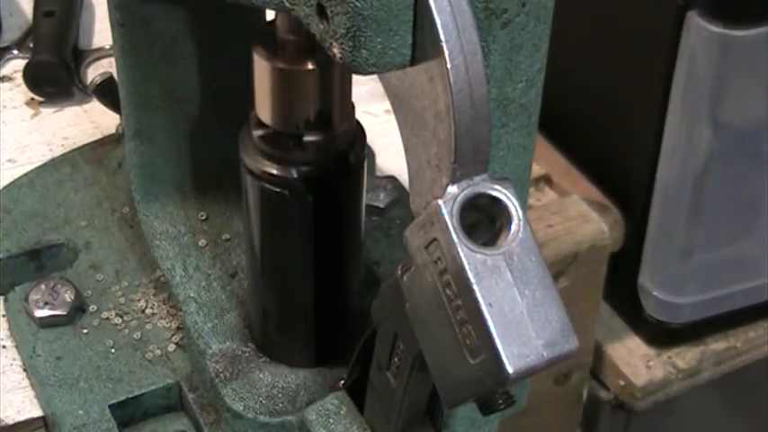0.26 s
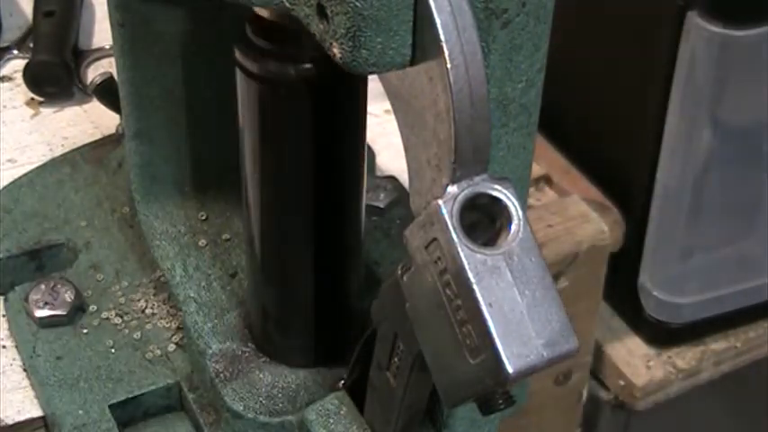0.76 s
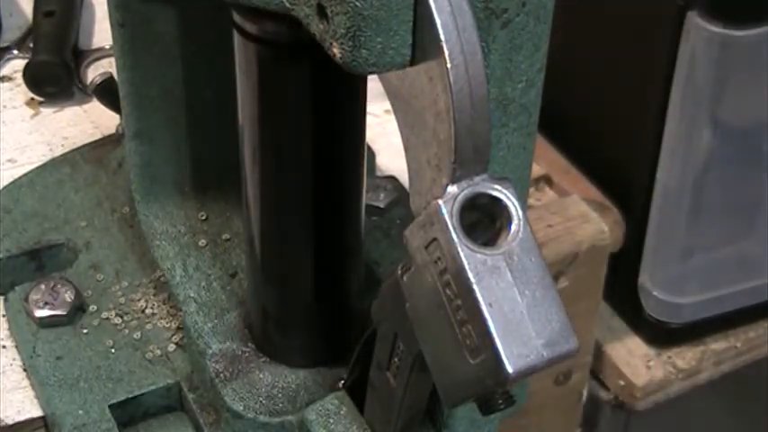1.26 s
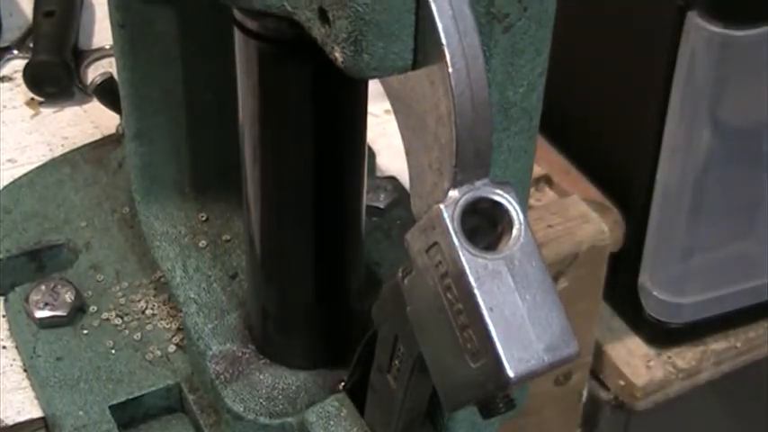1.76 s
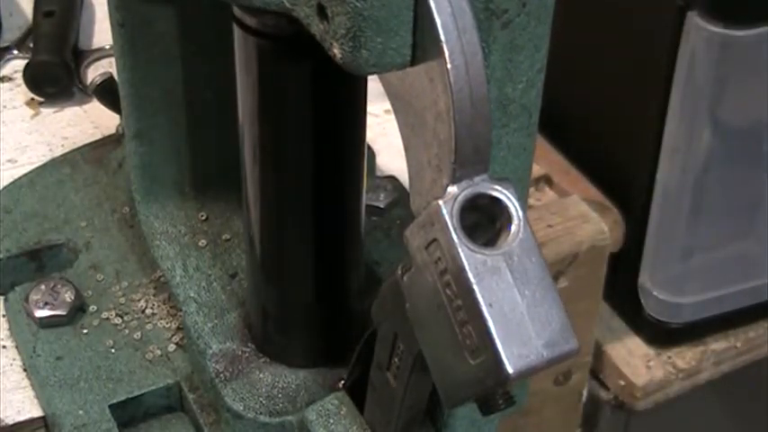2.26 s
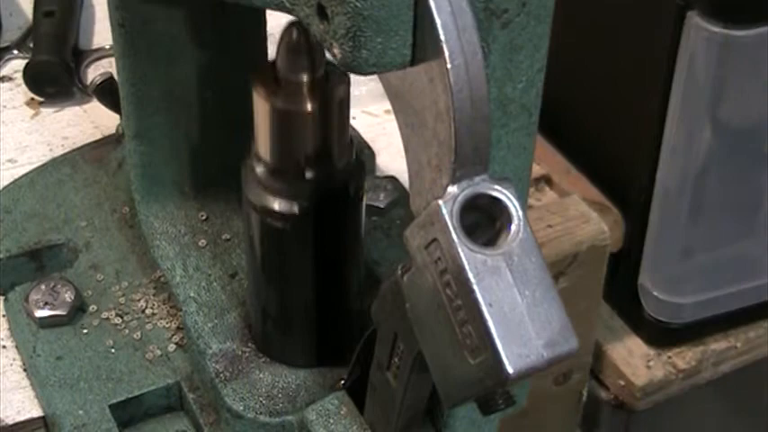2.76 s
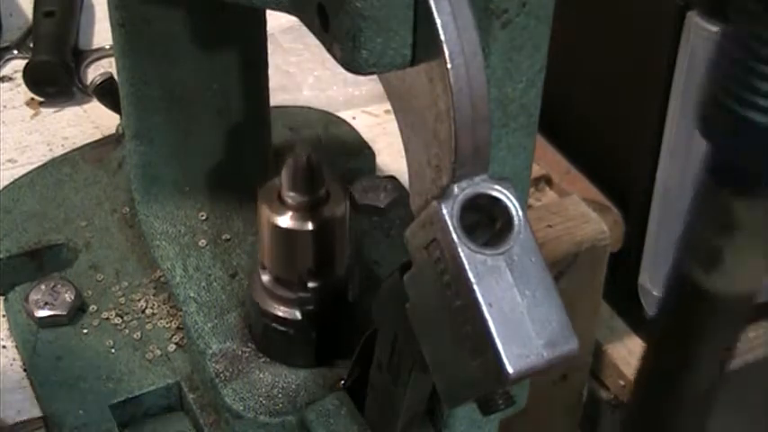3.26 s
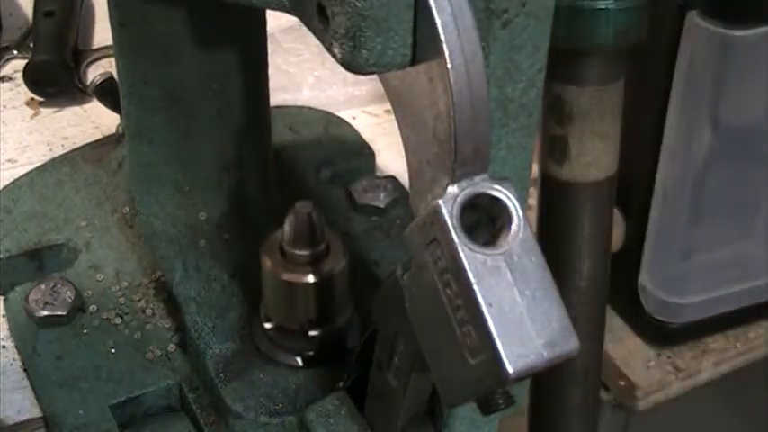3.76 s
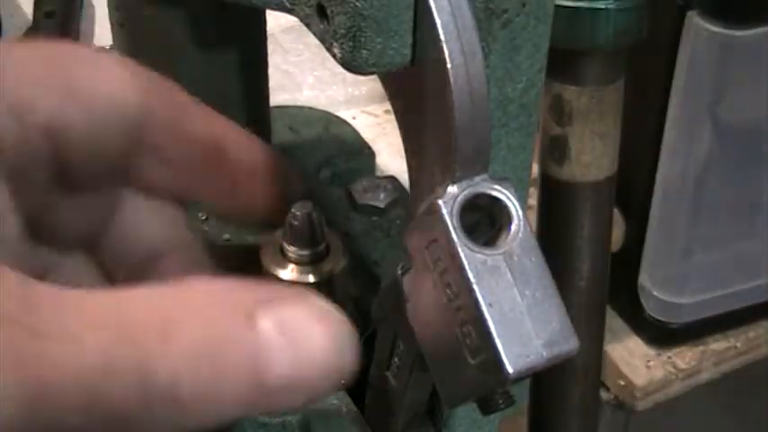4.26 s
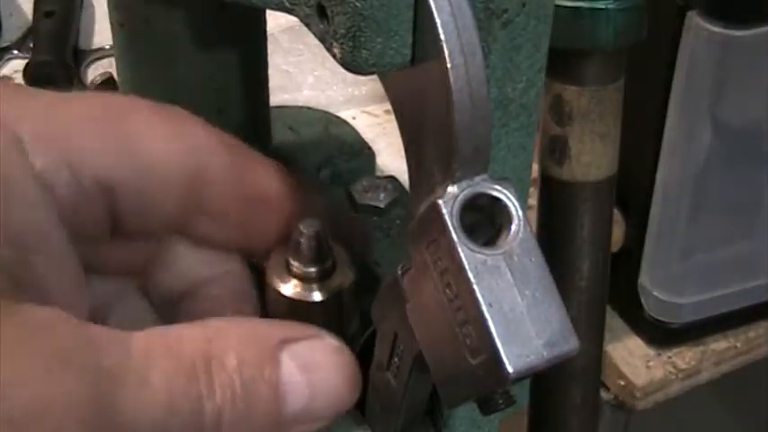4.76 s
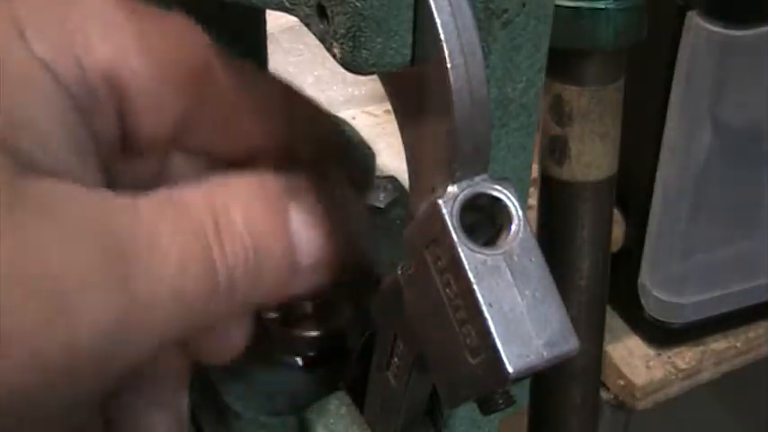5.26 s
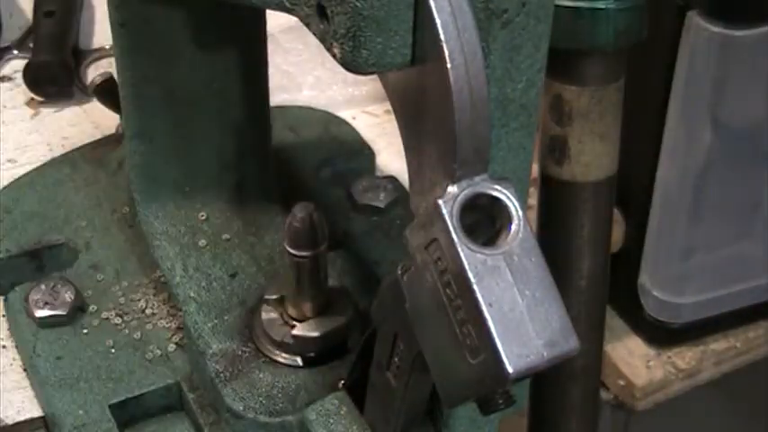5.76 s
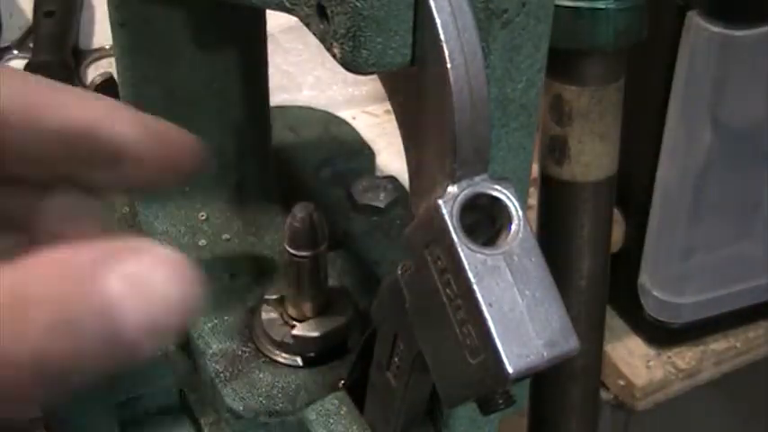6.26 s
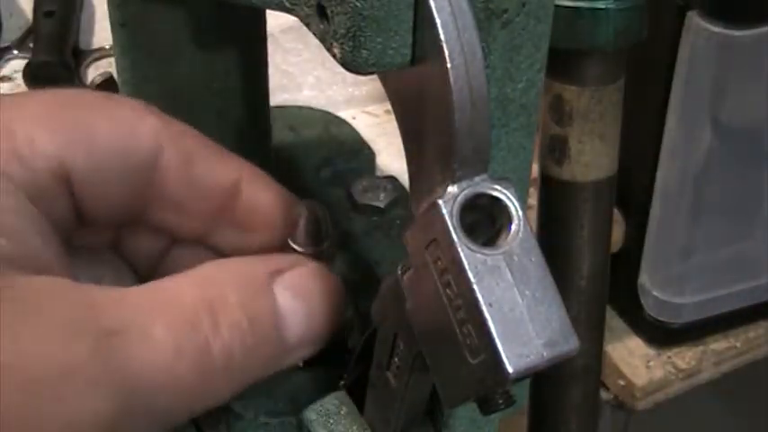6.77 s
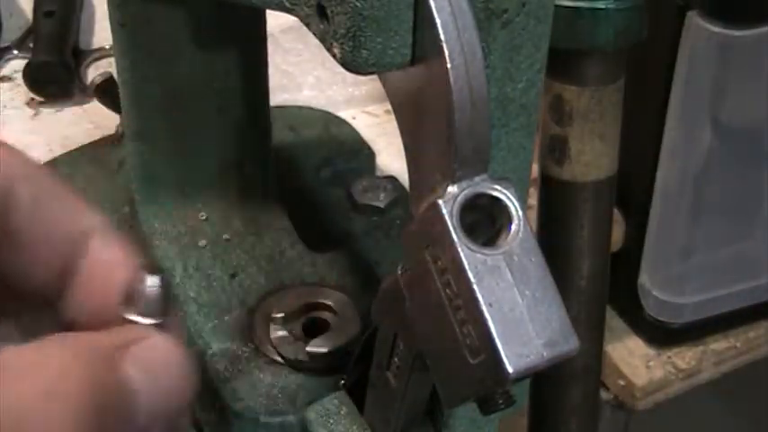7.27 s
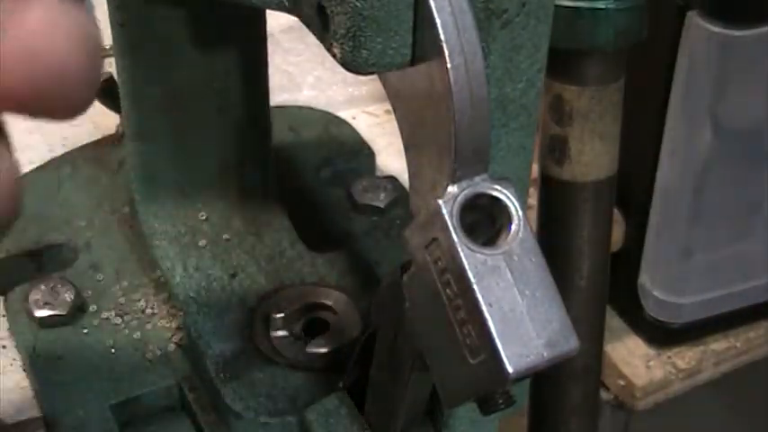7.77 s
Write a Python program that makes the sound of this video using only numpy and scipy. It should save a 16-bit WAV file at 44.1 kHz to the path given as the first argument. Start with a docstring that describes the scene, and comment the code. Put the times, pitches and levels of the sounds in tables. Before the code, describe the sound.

Close-up bench sounds: light pin clicks over a soft metallic rub, a solid clunk, a brighter burst of clattering steel, small knocks and a low lever thump with short casting resonance. Finer handling follows: scratchy collar clicks, a clear little metal tap on the bench, quiet ticks and a sharp final click. The room is dry and short, with low murmur, hiss and faint regular mechanical ticking.

```python
"""A cast-steel hand press bolted to a wooden bench: lever pins click, the ram rises, bottoms out, rattles free
and drops, and the lever lands on its stop. Then fingers work a brass collar loose, set it on the bench and
slide the cartridge out of its holder. Contacts are short pushes that ring modes and excite a room tail.
Throughout, shaped noise gives shudder, rubbing, rustle and workshop murmur, and a camera's drive ticks in a
fixed pattern."""
import sys
import numpy as np
from scipy import signal
from scipy.fft import rfft, irfft, next_fast_len
from scipy.io import wavfile
from scipy.ndimage import map_coordinates

SR = 44100
rng = np.random.default_rng(int(sys.argv[2]) if len(sys.argv) > 2 else 0)


def ratio(d):
    """dB to gain"""
    e = np.asarray(d, float) / 20
    return 10 ** e


def store_pcm(level_fs):
    """Save levels as 16-bit WAV."""
    pcm = np.round(np.clip(level_fs, -1, 1) * 32767).astype(np.int16)
    wavfile.write(sys.argv[1], SR, np.atleast_2d(pcm).T)


N = 352800

# Contacts of the press and of the lever on its stop.
# Each row: time in seconds, treble peak in dB, thud level in dB, clank level in dB.
PRESS_CONTACTS = [(1.203, -60, -46, -70), (1.471, -49, -53.5, -56), (1.775, -38, -37, -39),
                  (1.787, -25, -24.5, -20), (1.791, -21, -20.5, -25.5), (1.821, -27.5, -50, -68),
                  (1.843, -33.5, -62, -41.5), (1.889, -50, -48, -45.5), (2.156, -59, -47.5, -72),
                  (2.228, -41.5, -45, -66), (2.278, -31, -29, -33.5), (2.288, -14.5, -31.5, -25),
                  (2.346, -24, -39, -59), (2.35, -11.5, -49, -34.5), (2.355, -20, -46, -27.5),
                  (2.396, -17.5, -48.5, -41), (2.4224, -18, -44, -53), (2.428, -12.5, -47, -65),
                  (2.539, -77, -43.5, -42), (2.761, -42, -56, -56.5), (3.07, -74, -40, -77),
                  (3.087, -40.5, -70, -50), (3.12, -36, -30.5, -31.5), (3.152, -63, -30.5, -39),
                  (3.892, -61, -58, -54.5)]
LEVER_CONTACTS = [(3.58, -36, -28.5, -39), (3.588, -21, -28, -25), (3.617, -29, -22.5, -33.5),
                  (3.63, -38, -29, -45), (3.656, -40.5, -45, -59)]
# Modes of the press casting. Each row: frequency in Hz, width in Hz, relative strength in dB.
PRESS = [(129, 29, -3.5), (192, 35, 0.5), (277, 77, 0), (433, 60, -1), (510, 83, -5), (680, 47, -2),
         (936, 62, -6), (1333, 63, -12), (1750, 720, -31), (2416, 290, 2.5), (3490, 800, 14.5),
         (4470, 4200, 11.5), (8500, 1700, 6.5), (11060, 1070, 10), (12500, 7700, 24.5)]


def unit(x):
    """Scales to rms 1."""
    return x / np.sqrt(np.mean(x ** 2) + 1e-20)


def along(points, hz):
    """Interpolates (Hz, value) points on a log frequency axis."""
    f, v = np.transpose(points)
    return np.interp(np.log(hz + 1), np.log(f + 1), v)


def wobble(rate):
    """A smooth random curve with rate knots a second."""
    knots = rng.standard_normal(int(N * rate / SR) + 4)
    return map_coordinates(knots, [np.arange(N) * rate / SR])


def rush(spectrum, alike=None):
    """Stereo noise of rms 1 with a given spectrum, partly shared by both ports."""
    # Default likeness of left and right. Each row: frequency in Hz, correlation.
    usual_alike = [(60, -1.8), (380, -0.75), (2380, -0.34), (15000, -0.2)]
    m = next_fast_len(N)
    hz = np.fft.rfftfreq(m, 1 / SR)
    likeness = along(usual_alike if alike is None else alike, hz)
    turn = np.arccos(np.clip(likeness, -1, 1)) / 2
    shape = ratio(along(spectrum, hz)) * [np.cos(turn), np.sin(turn)]
    mid, side = irfft(rfft(rng.standard_normal((2, m))) * shape, m)[:, :N]
    return unit(np.array([mid + side, mid - side]))


def ringing(modes, t, scatter_db, detune):
    """One row per mode: a sine that dies faster the wider the mode, with random strength and pitch offsets."""
    hz, width, db = np.transpose(modes)[:, :, None]
    size, shift = rng.standard_normal((2, *hz.shape))
    sign = (-1.) ** np.arange(len(hz))[:, None]  # neighbouring modes start in opposite directions
    strength = sign * ratio(db + scatter_db * size)
    return strength * np.exp(-np.pi * width * t) * np.sin(2 * np.pi * hz * (1 + detune * shift) * t)


def chatter(spells, count=4):
    """Random small contacts of loose parts, count of them inside each spell."""
    scatter_db = 2
    rows = []
    for start, length, *levels in spells:
        when, size = rng.random(count), rng.standard_normal((count, 3))
        times = start + length * (np.arange(count) + when) / count
        rows += list(np.column_stack([times, levels + scatter_db * size]))
    return rows


def struck(hits, modes, thud_hz, crack, dense, pan_db, detune, lightness_db, contact_ms, wood, bottom_hz, gritty):
    """Each contact is a short gritty push that rings low, middle and high modes, each band at its own level."""
    dull_doubles_db = 36  # contact time doubles when the thud gains this much on the treble
    edge_even_hz, sharp_doubles_db = 6840, 23  # top of the treble; doubles as treble gains this on clank
    bench_t60_s, body_t60_s, rise_ms = 0.12, 0.034, 1
    out, t = np.zeros((2, N + SR)), np.arange(SR // 12) / SR
    hz, head = np.array(modes)[:, 0], SR // 100

    def band(low_high_hz):
        return signal.butter(2, low_high_hz, "band", fs=SR, output="sos")

    def level(x, db):
        """Sets the rms of the first 10 ms."""
        return ratio(db) * x / np.sqrt(np.mean(x[:head] ** 2))

    def dense_modes(low_high_hz, t60_s):
        """Countless weak modes, as decaying noise."""
        return signal.sosfilt(band(low_high_hz), rng.standard_normal(len(t))) * ratio(-60 * t / t60_s)

    soft = band([400, 4500])
    floor = signal.butter(2, bottom_hz, "high", fs=SR, output="sos")  # a small thing sends out no deep bass
    for s, treble_db, thud_db, clank_db in hits:
        ms = contact_ms * 2 ** ((thud_db - treble_db) / dull_doubles_db)
        fade = np.exp(-t[:head * 3] / np.clip(ms / 1000, 1e-4, .015))
        push = np.gradient(fade ** 3 * (1 - fade ** 6) ** 2)  # the bench follows the change of a smooth push
        grit = fade * rng.standard_normal((3, head * 3))
        grit[1:] *= fade  # the treble lasts only while the touch is hard
        grit[1:, 0] += 1.5  # the first touch is the sharpest
        grit[0] *= gritty / np.linalg.norm(grit[0])
        grit[0, 0] = 1  # one firm blow leads the grit

        light = np.clip((clank_db - thud_db) / lightness_db, -1, 1)  # light taps ring high, heavy blows low
        rings = ringing(modes, t, scatter_db=4.0, detune=detune)
        rings *= ratio(6.7 * light * np.log2(np.clip(hz, thud_hz, 4000) / 1500))[:, None]
        rings *= ratio(1.3 * light * np.log2(np.clip(hz / thud_hz, 0, 1)))[:, None]

        low = rings[hz < thud_hz].sum(0)
        low += wood * dense_modes(np.array([150, 700]) * 0.97 ** light, bench_t60_s)
        middle = rings[(hz >= thud_hz) & (hz < 4000)].sum(0)
        middle += dense * dense_modes(np.array([600, 2000]) * 2.0 ** light, body_t60_s)
        middle *= 1 - np.exp(-t * 1000 / rise_ms)  # the touch firms up
        high = rings[hz >= 4000].sum(0)
        high[:3] += crack * np.array([1, -2, 1])  # the bare crack has no bass
        edge_hz = np.clip(edge_even_hz * 2 ** ((treble_db - clank_db) / sharp_doubles_db), 3000, 20000)
        high = signal.sosfilt(band([0.23 * edge_hz, edge_hz]), high)

        parts = [signal.sosfilt(floor, low), signal.sosfilt(soft, middle), high, np.gradient(high)]
        thud, clank, click, other = signal.fftconvolve(parts, [push, *grit], axes=1)[:, :len(t)]
        difference = 0.35 * np.sign(grit[2, 1]) * np.outer([1, -1], other)  # treble differs between ports
        treble = ratio(treble_db) / abs(click).max() * (click + difference)
        out[:, round(s * SR):][:, :len(t)] += level(thud, thud_db) + level(clank, clank_db) + treble
    return out[:, :N] * ratio([[pan_db / 2], [-pan_db / 2]])


def press():
    """Blows and chatter of the ram ring the steel casting and the bench."""
    # Each row: start in seconds, length in seconds, mean treble peak, thud and clank in dB.
    spells = [(1.797, 0.0089, -37, -32, -70), (1.83, 0.1, -44, -42, -44), (2.262, 0.025, -48, -56, -52),
              (2.292, 0.042, -36, -38, -47), (2.356, 0.017, -41, -44.5, -51),
              (2.397, 0.01, -28, -52.5, -41.5), (2.436, 0.019, -20, -50.5, -40),
              (3.075, 0.049, -92, -40, -43.5), (3.13, 0.055, -67, -39, -52),
              (3.59, 0.041, -35.5, -28.5, -35), (3.64, 0.055, -51, -49, -52)]
    return struck(PRESS_CONTACTS + chatter(spells), PRESS, thud_hz=465, crack=0.6, dense=4.9, pan_db=1.4,
                  detune=0.036, lightness_db=13.0, contact_ms=3.3, wood=3.9, bottom_hz=40, gritty=0.45)


def lever():
    """The lever lands on its stop: its own low modes, and higher up those of the press casting."""
    # Each row: frequency in Hz, width in Hz, relative strength in dB.
    modes = [(149, 83, 0), (511, 61, 0.5), (990, 75, -6)] + PRESS[6:]
    return struck(LEVER_CONTACTS, modes, thud_hz=600, crack=.6, dense=2.04, pan_db=1.8,
                  detune=0.027, lightness_db=22, contact_ms=2.1, wood=1.3, bottom_hz=60.4, gritty=0.56)


def lever_pins():
    """Small contacts ring the lever pins."""
    # Each row: time in seconds, treble peak in dB, thud level in dB, clank level in dB.
    hits = [(0.794, -45, -55, -47.5), (0.803, -51, -52, -46), (0.912, -63, -57, -55.5),
            (1.01, -26.5, -47.5, -36), (1.07, -59, -53, -52), (1.12, -28.5, -46, -37),
            (1.154, -30, -50, -42.5), (3.502, -47.5, -52, -49), (3.51, -47, -49.5, -38.5)]
    # Each row: frequency in Hz, width in Hz, relative strength in dB.
    modes = [(466, 37, -6.5), (840, 30, -4), (1014, 63, -9), (1980, 330, -4.5), (2504, 150, -3),
             (2780, 100, -6), (3180, 195, -4), (3550, 200, -9.5), (4370, 510, -5), (5700, 3000, 13),
             (8500, 7400, 18.5)]
    return struck(hits, modes, thud_hz=900, crack=.4, dense=1.0, pan_db=2.7,
                  detune=0.012, lightness_db=13, contact_ms=3.6, wood=2.7, bottom_hz=250, gritty=1.0)


def collar():
    """The brass collar clicks and chatters as fingers work it loose."""
    # Each row: time in seconds, treble peak in dB, thud level in dB, clank level in dB.
    hits = [(4.413, -39, -63, -52), (4.443, -27.5, -45, -46), (4.493, -33.5, -54.5, -49),
            (4.539, -18, -67, -48), (4.582, -25, -41, -38), (4.636, -44, -68, -47.5),
            (4.668, -31, -60, -46), (4.731, -17, -34.5, -34), (4.76, -32, -42.5, -42),
            (5.0665, -12.5, -52.5, -40.5), (5.09, -41, -35, -38.5), (5.103, -66, -36.5, -48),
            (5.164, -27.5, -62, -51), (5.214, -35.5, -53.5, -43.5), (5.378, -38, -71, -50),
            (5.406, -42, -49.5, -48.5)]
    # Each row: start in seconds, length in seconds, mean treble peak, thud and clank in dB.
    spells = [(4.43, 0.033, -49, -51, -48.5), (4.585, 0.025, -60, -47, -59), (4.735, 0.053, -62, -65, -50),
              (5.042, .035, -36, -68, -51), (5.15, 0.056, -42, -55, -47.5), (5.2, 0.046, -50, -58, -53.5),
              (5.37, 0.064, -41, -64, -59)]
    # Each row: frequency in Hz, width in Hz, relative strength in dB.
    modes = [(401, 21, -13), (502, 42, 1.5), (710, 55, 0), (1003, 210, 2.5), (1470, 36, -14.5),
             (2145, 430, -1), (3190, 680, 9), (4440, 1070, -0.5), (5600, 460, -4.5), (8240, 1700, 8.5),
             (11400, 2900, 4), (15800, 1600, 10.5)]
    return struck(hits + chatter(spells), modes, thud_hz=900, crack=0.28, dense=1.4, pan_db=1.0,
                  detune=0.018, lightness_db=15, contact_ms=3.14, wood=2.6, bottom_hz=117, gritty=1.0)


def setdown():
    """The collar taps the bench, first damped by the fingers, then ringing freely."""
    # Each row: time in seconds, treble peak in dB, thud level in dB, clank level in dB.
    hits = [(5.681, -21.5, -42, -33.5), (5.782, -22, -44, -40), (5.859, -47, -57, -53.5),
            (5.921, -44, -42.5, -32), (5.929, -34.5, -35.5, -27.5), (5.9595, -30, -48, -31),
            (5.963, -31, -47, -22), (5.99, -26, -35.5, -20), (6.011, -38, -36.5, -31.5)]
    # Free modes. Each row: frequency in Hz, width in Hz, relative strength in dB.
    modes = [(351, 26, -12), (728, 32, -17), (1007, 22, -18), (1267, 46, -5), (1326, 74, -1),
             (1510, 65, -8.5), (1647, 120, -7.5), (2040, 110, -6), (2413, 35, -26), (3070, 260, -4.5),
             (3860, 1300, -1), (7940, 2200, 10)]
    gripped = [(hz, 2.3 * width, db) for hz, width, db in modes]  # fingers widen every mode
    bench_top = dict(thud_hz=600, crack=0.11, dense=1.0, pan_db=2.5, detune=0.0089, lightness_db=25,
                     contact_ms=3.4, wood=0.24, bottom_hz=307, gritty=0.28)
    return struck(hits[:3], gripped, **bench_top) + struck(hits[3:], modes, **bench_top)


def holder():
    """The cartridge sliding out clicks against its holder."""
    # Each row: time in seconds, treble peak in dB, thud level in dB, clank level in dB.
    hits = [(6.4995, -34, -83, -46), (6.505, -20.5, -48, -42), (6.559, -35, -72, -48.5),
            (6.594, -68, -75, -58), (6.642, -55, -65, -43.5), (6.648, -25, -63, -60),
            (6.654, -25, -50, -43.5), (6.692, -33, -77, -59), (6.744, -62, -74, -51.5),
            (6.777, -50, -60, -50), (6.865, -92, -54.5, -64.5), (6.918, -80, -65, -52),
            (6.962, -74.5, -67, -51.5), (7.009, -49, -71, -55.5), (7.0255, -18, -76, -32),
            (7.0272, -5.5, -47.5, -35), (7.072, -38, -79, -65)]
    # Each row: start in seconds, length in seconds, mean treble peak, thud and clank in dB.
    spells = [(7.03, 0.05, -38, -60, -50)]
    # Each row: frequency in Hz, width in Hz, relative strength in dB.
    modes = [(526, 83, 5.5), (678, 17, -5.5), (1493, 68, -5.5), (2020, 24, -18), (3200, 420, 3),
             (5800, 1340, -7.5), (6070, 710, 0), (7520, 480, -3), (8340, 2540, 8.5), (10800, 3300, -2.5)]
    return struck(hits + chatter(spells), modes, thud_hz=900, crack=0.0493, dense=2.3, pan_db=1.5,
                  detune=0.03, lightness_db=32.0, contact_ms=3.2, wood=3.4, bottom_hz=200, gritty=0.25)


def frame():
    """Frame and bench hum on: narrow noise bands fed by each press or lever thud, dying slowly."""
    # Each row: frequency in Hz, width in Hz, strength relative to the thud in dB, t60 in seconds.
    bands = [(47.5, 52, -18.5, 0.8), (284.6, 82, -19, 0.85), (560, 520, -24.5, 1)]
    s, _, thud_db, _ = np.transpose(PRESS_CONTACTS + LEVER_CONTACTS)
    energy, t, out = np.zeros(N), np.arange(SR) / SR, 0
    energy[np.round(s * SR).astype(int)] = ratio(2 * thud_db)
    for hz, width, db, t60 in bands:
        band = signal.butter(2, [hz - width / 2, hz + width / 2], "band", fs=SR, output="sos")
        decay = ratio(-120 * t / t60) * (1 - np.exp(-t / 0.021))  # of energy, with a 21 ms rise
        fade = np.sqrt(abs(signal.fftconvolve(energy, decay)[:N]))
        out = out + ratio(db) * fade * unit(signal.sosfilt(band, rng.standard_normal(N)))
    return out


def shop(x, wide):
    """Bench and workshop ring on: a new noise tail per third of a second, each frequency dying at its own speed."""
    # Each row: frequency in Hz, t60 in seconds.
    t60_s = [(100, 0.95), (400, 0.18), (1500, 0.17), (5000, 0.077), (14000, 0.078)]
    # Each row: frequency in Hz, relative strength of the tail in dB.
    colour_db = [(100, -22.5), (400, -9), (1500, -6.5), (5000, -7.5), (14000, -10.5)]
    out, step = np.zeros((2, N + 2 * SR)), SR // 3
    for start in range(0, N, step):
        hz, t, z = signal.stft(rng.standard_normal((2, SR // 2)), SR, nperseg=256)
        decay_db = -60 * t / along(t60_s, hz)[:, None] + along(colour_db, hz)[:, None]
        mid, side = signal.istft(z * ratio(decay_db), SR, nperseg=256)[1]
        tail = (mid + wide * np.outer([1, -1], side)) / np.sqrt(SR / 100)
        wet = signal.fftconvolve(x[:, start:start + step], tail, axes=1)
        out[:, start + 130:][:, :wet.shape[1]] += wet  # the nearest surfaces answer after 3 ms
    return out[:, :N]


def motion():
    """Ram, then hands: one strength curve drives shudder, metal rub and sleeve rustle in uneven lumps, with swishes."""
    # Each row: time in seconds, strength in dB (only changes about the mean count).
    strength_points = [(0, -56), (.3, -58.5), (1.75, -56.5), (1.9, -51), (2.07, -47.5), (2.18, -52.5),
                       (2.6, -55), (3.05, -51.5), (3.2, -55), (3.4, -55), (3.7, -57), (3.9, -56),
                       (4.35, -59.5), (5.2, -55), (7.2, -63.5), (8, -62.5)]
    # Passing swishes. Each row: centre in seconds, length in seconds, rub in dB, rustle in dB.
    brushes = [(0, 0.84, -56, -91), (3.993, 0.27, -67, -68), (5.411, 0.065, -69, -53.5),
               (7.297, 0.13, -88, -59)]
    # Noise spectra. Each row: frequency in Hz, relative density in dB per Hz.
    shudder_spectrum = [(32, 0), (48, -2.5), (85, -3), (280, -3.5), (600, -17), (1200, -31.5)]
    rub_spectrum = [(250, -57), (450, -1.5), (500, 8.5), (560, 3.5), (1400, 0), (1525, 2.5), (1700, -2.5),
                    (4000, -23), (7000, -83)]
    rustle_spectrum = [(1470, -66), (2500, -5), (3630, -7), (6450, -12), (16000, -24.5)]
    # Left-right likeness of the shudder. Each row: frequency in Hz, correlation.
    shudder_alike = [(50, 0.2), (600, 0.1)]
    t = np.arange(N) / SR
    strength_db = np.interp(t, *np.transpose(strength_points))
    strength_db -= strength_db.mean()

    def swell(levels_db):
        """Triangular swells, one per swish."""
        return sum(ratio(db) * np.clip(1 - abs(2 * (t - s) / length), 0, 1)
                   for (s, length, *_), db in zip(brushes, levels_db))

    *_, brush_rub_db, brush_rustle_db = np.transpose(brushes)
    # level at average strength, plus dB for each dB of strength
    shudder = ratio(-59.5 + 0.59 * strength_db)
    rub = ratio(-58.5 + 0.63 * strength_db) + swell(brush_rub_db)
    rustle = ratio(-61.5 + 0.5 * strength_db) + swell(brush_rustle_db)
    lumps = ratio(2 * np.array([wobble(14), wobble(30), wobble(40)]))
    return (lumps[0] * shudder * rush(shudder_spectrum, shudder_alike)
            + lumps[1] * rub * rush(rub_spectrum)
            + lumps[2] * rustle * rush(rustle_spectrum))


def drive():
    """The camera's drive repeats one pattern of ticks that ring its shell."""
    # Each row: time within the cycle in seconds, mean impulse strength in dB.
    pattern = [(0.018, -57), (0.051, -57), (.056, -60), (0.084, -55), (0.1397, -55)]
    # Shell modes. Each row: frequency in Hz, width in Hz, relative strength in dB.
    modes = [(2024, 92, 2.5), (2980, 150, 12.5), (4400, 360, 4.5)]
    cycle_s, scatter_db = .15016, 2.5
    at, db = np.transpose(pattern)
    times = (np.arange(int(N / SR / cycle_s))[:, None] * cycle_s + at).ravel()
    tick_db = np.resize(db, len(times)) + scatter_db * rng.standard_normal(len(times))
    ticks = np.zeros(N)
    ticks[np.round(times * SR).astype(int)] = ratio(tick_db)
    shell = ringing(modes, np.arange(SR // 20) / SR, scatter_db=0, detune=0).sum(0)
    return np.outer([1, -.3], signal.fftconvolve(ticks, shell)[:N])  # through the shell, unlike at each port


def hum():
    """Steady shaped noise: the murmur and hiss of the quiet workshop."""
    # Each row: frequency in Hz, relative density in dB per Hz.
    spectrum = [(30, -28), (46, -2), (87, -4), (293, 0), (344, -0.5), (714, -5), (1610, -14.5), (2050, -4),
                (2480, -23), (2910, -9.5), (3520, -35), (8360, -21.5), (16000, -44)]
    return ratio(-57.5) * rush(spectrum)


def scene():
    """Contacts with their room, over motion, hum, the camera's ticking and the humming frame."""
    hits = press() + lever() + lever_pins() + collar() + setdown() + holder()
    return hits + shop(hits, wide=0.3) + motion() + hum() + drive() + frame()


def roll_off(x):
    """The treble ends steeply here."""
    return signal.sosfilt(signal.butter(12, 16960, fs=SR, output="sos"), x)


def record(dry):
    """A low cut removes the deepest bass, a steep cut near 15.7 kHz the highest treble."""
    low_cut = signal.butter(2, 45, "high", fs=SR, output="sos")
    high_cut = signal.cheby1(8, 1, 15700, fs=SR, output="sos")
    mix = signal.sosfilt(np.vstack([low_cut, high_cut]), dry)
    return roll_off(mix)


dry = scene()
out = record(dry)
store_pcm(out)
```